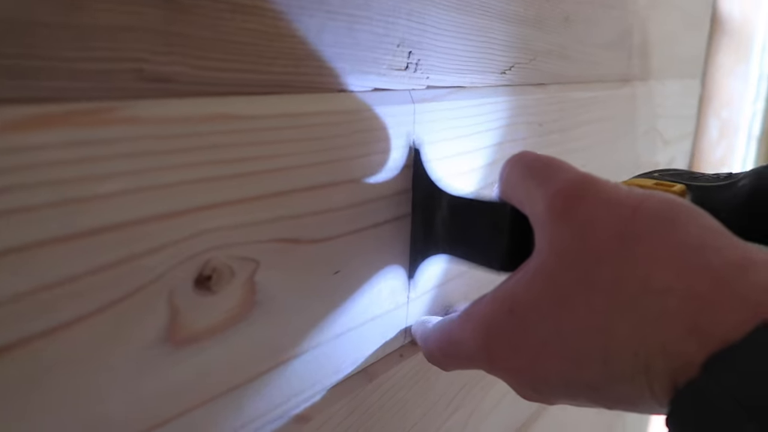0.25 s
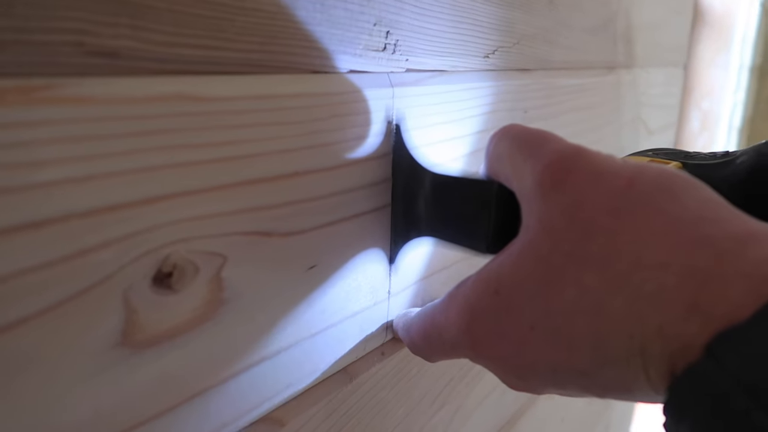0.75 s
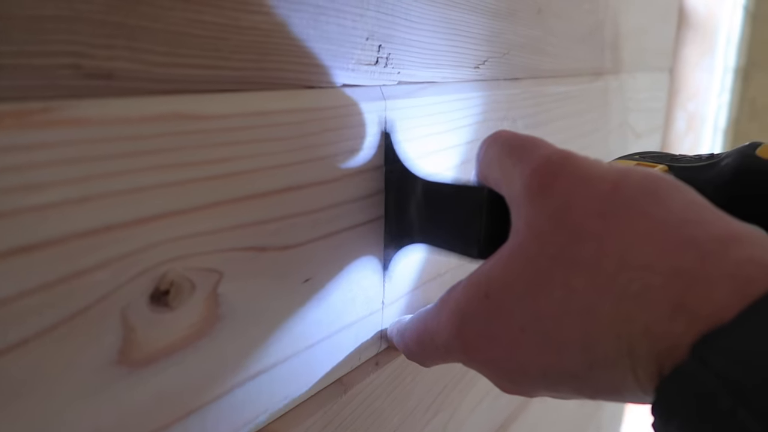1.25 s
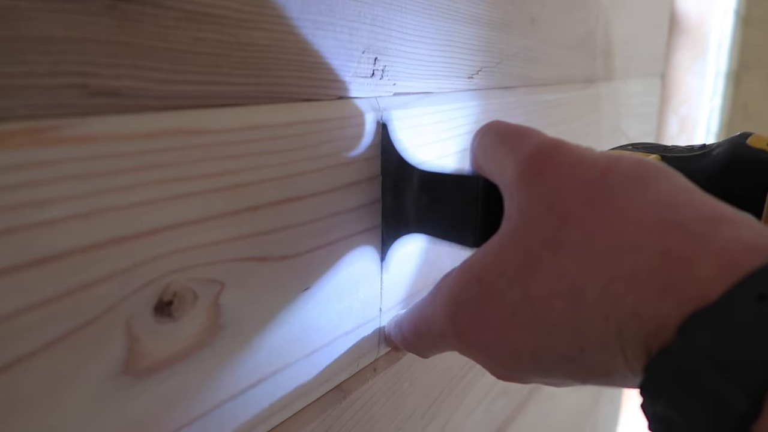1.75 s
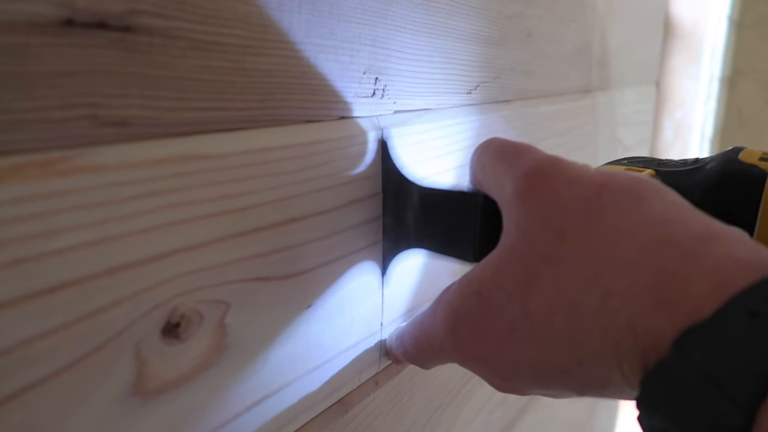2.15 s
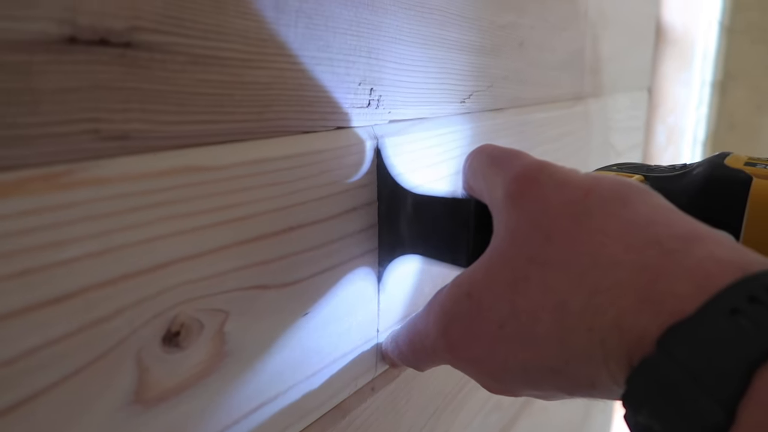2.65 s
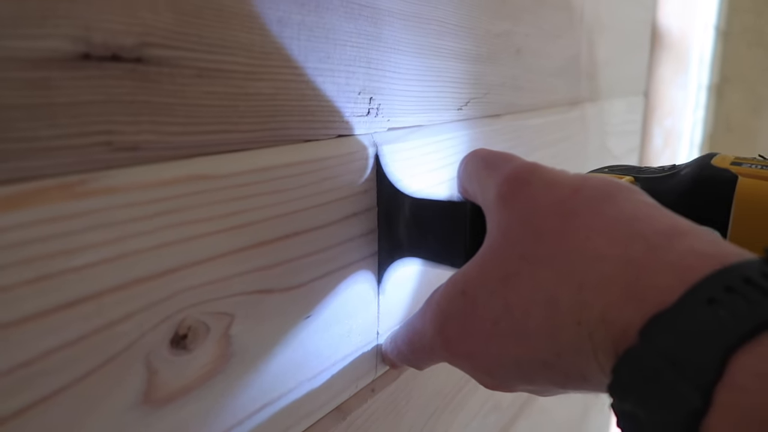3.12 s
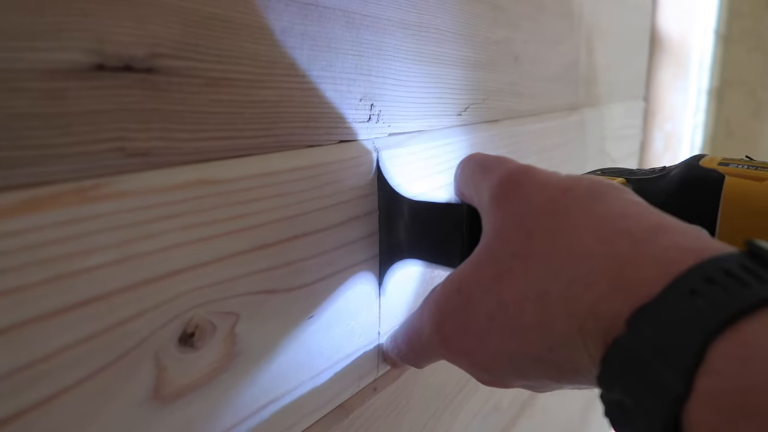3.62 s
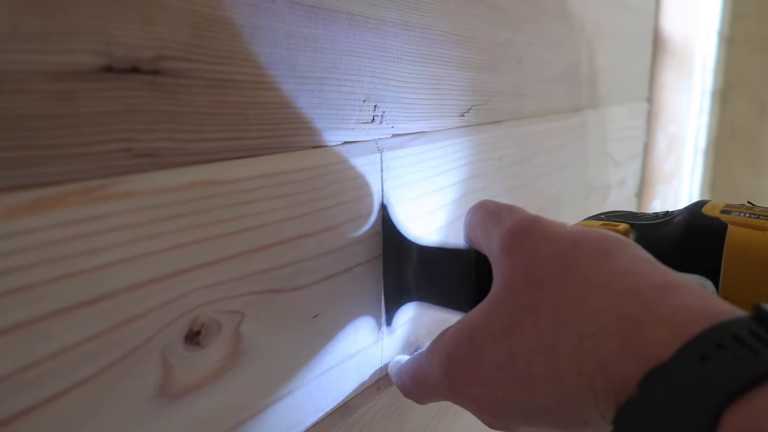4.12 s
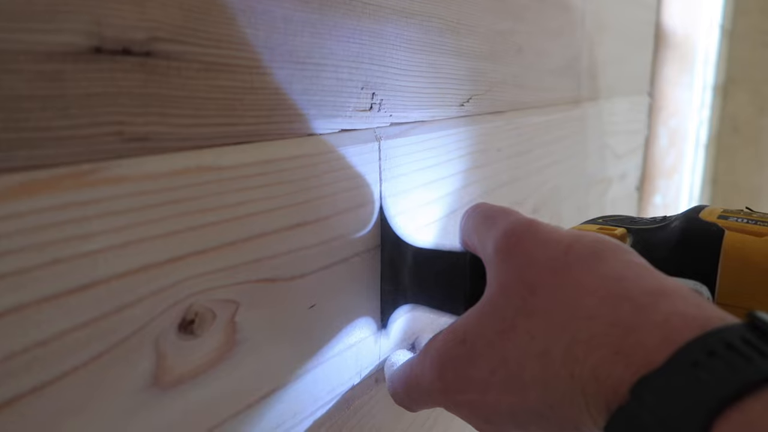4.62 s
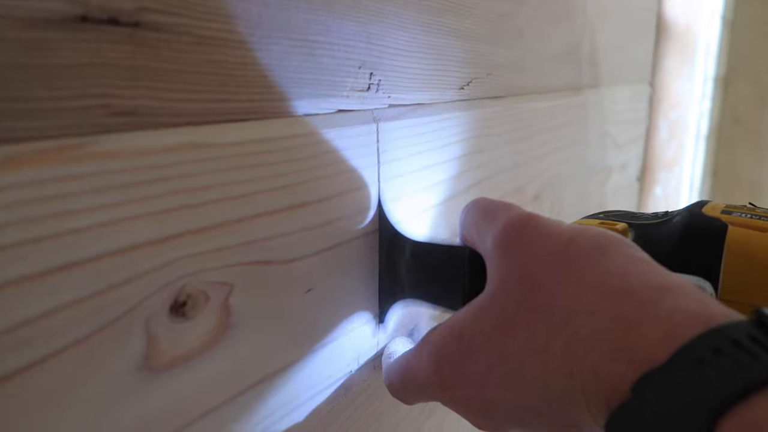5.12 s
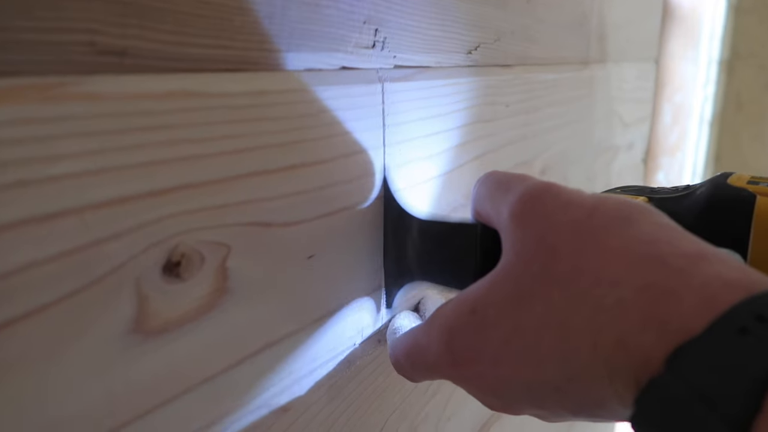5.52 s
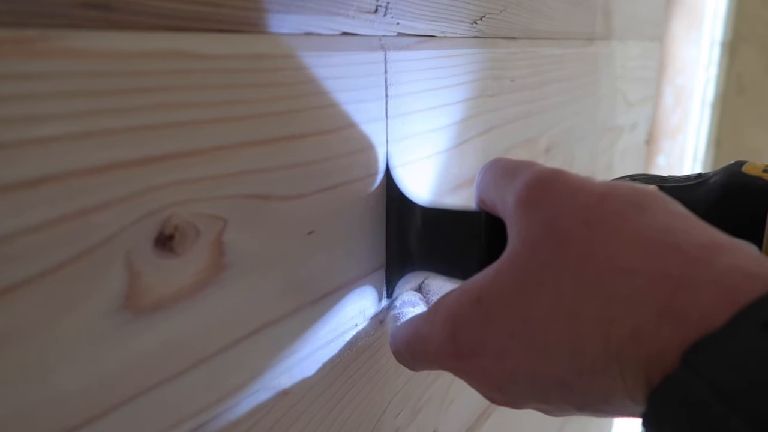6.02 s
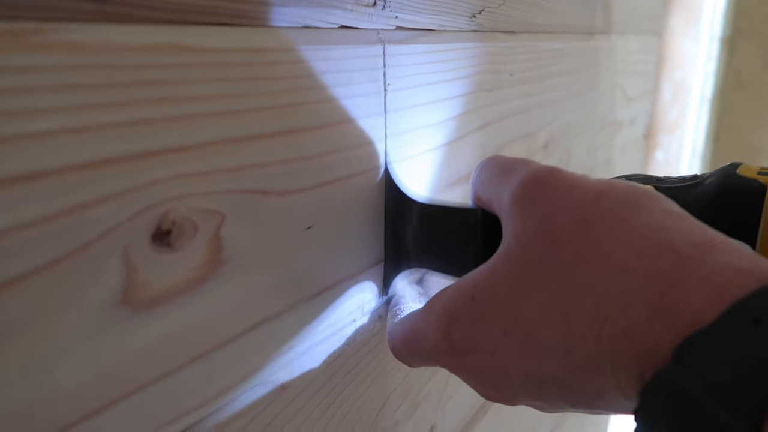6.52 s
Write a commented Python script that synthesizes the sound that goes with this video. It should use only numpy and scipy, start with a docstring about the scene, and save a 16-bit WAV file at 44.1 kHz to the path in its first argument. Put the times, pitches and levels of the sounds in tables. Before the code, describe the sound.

Close up indoors, an oscillating saw buzzes and rasps through wood, squealing briefly as its pitch sags in steps.

```python
"""A bare room, close up: an oscillating tool scores a line into softwood boards.
Every swing of the blade shakes the boards alike, giving a stack of overtones on the swing rate,
which sags under load. Board resonances lift some overtones; others squeal or sing as the blade catches.
The teeth rasp twice a swing, at times every second swing bites harder, and the walls add a short tail."""
import sys
import numpy as np
from scipy import signal
from scipy.io import wavfile
from scipy.ndimage import uniform_filter1d

SR = 44100
rng = np.random.default_rng(int(sys.argv[2]) if len(sys.argv) > 2 else 0)


def transcribe(signal):
    """Save signal, clipped to [-1, 1], as a 16-bit WAV file at the path in sys.argv[1]."""
    frames = np.atleast_2d(signal).T
    limited = np.clip(frames, -1, 1)
    pcm = np.round(limited * 32767).astype(np.int16)
    wavfile.write(sys.argv[1], SR, pcm)


N = 298116
STEP = 64   # samples per control step
CONTROL_S = np.arange(N // STEP + 2) * STEP / SR

# noise of torn fibres: time_s, level_db
TEARING = [(0.0, -27), (0.23, -35), (0.52, -29), (0.87, -31.5), (1.04, -25.5), (1.22, -34), (1.42, -29),
           (1.55, -25), (1.64, -31), (1.8, -30.5), (2.1, -35), (2.4, -26), (2.65, -36), (3.05, -34.5),
           (3.23, -25.5), (3.43, -28.5), (3.6, -34), (3.8, -27.5), (4.07, -22), (4.3, -23.5), (4.8, -26),
           (4.95, -29.5), (5.15, -28), (5.51, -30), (5.7, -23.5), (5.85, -26.5), (6.2, -31.5),
           (6.45, -26.5), (6.76, -34.5)]
# stereo width: freq_hz, side_minus_mid_db
WIDTH = [(60, -26), (110, -2), (200, -30), (380, -10), (700, -20), (1290, -22.5), (2380, -17), (4400, -7),
         (8120, 1), (15000, -0.5)]


def from_db(db):
    return 10 ** (np.asarray(db) / 20)


def curves(rows):
    """Columns of a time table at control rate."""
    time_s, *columns = np.transpose(rows)
    return [np.interp(CONTROL_S, time_s, column) for column in columns]


def to_audio(control, steps=np.arange(N) / STEP):
    """Control rate to sample rate."""
    return np.interp(steps, np.arange(len(control)), control)


def at_hz(spectrum, hz):
    """Spectrum read on a log-frequency axis."""
    freq_hz, level_db = np.transpose(spectrum)
    return np.interp(np.log(hz), np.log(freq_hz), level_db)


def drift(corner_hz):
    """Low-passed noise at control rate, unit rms."""
    pole = np.exp(-2 * np.pi * corner_hz * STEP / SR)
    white = rng.standard_normal(len(CONTROL_S) + 1000)
    slow = uniform_filter1d(signal.lfilter([1], [1, -2 * pole, pole * pole], white), 5)[1000:]
    return slow / np.sqrt(np.mean(slow ** 2))


def gate(start_s, end_s, fade_s):
    """0-1 window with linear edges, at control rate."""
    return np.clip(np.minimum(CONTROL_S - start_s, end_s - CONTROL_S) / fade_s + .5, 0, 1)


def stereo(mid, side):
    return np.array([mid + side, mid - side])


def fast_cos(phase):
    return np.cos((phase % (2 * np.pi)).astype(np.float32))


def tone(cycles, hz, level_db, waver_db, slip_rad):
    """One partial; level and phase wander as the contact shifts, the side signal also on its own."""
    slow_db = waver_db * drift(10.2)
    flicker_db = (1.3 + 0.4 * np.abs(waver_db)) * drift(30.5)
    gain = np.sqrt(2) * from_db(level_db + slow_db + flicker_db)
    phase = 2 * np.pi * (cycles + rng.random()) + to_audio(slip_rad * drift(25.0))
    side_gain = gain * from_db(at_hz(WIDTH, hz) + 2.0 * drift(0.72))
    side_phase = phase + 2 * np.pi * rng.random() + to_audio(2.06 * drift(0.55))
    return stereo(to_audio(gain) * fast_cos(phase), to_audio(side_gain) * fast_cos(side_phase))


def room_tail(source, t60_s=.85, send_db=-11, wall_cutoff_hz=2200):
    """Dense, dull wall reflections, wider towards the treble."""
    t = np.arange(round(t60_s * SR)) / SR
    mid, side = rng.standard_normal((2, len(t))) * from_db(-60 * t / t60_s) * (t > .004)
    side = signal.sosfilt(signal.butter(2, 3500, "high", fs=SR, output="sos"), side)
    walls = signal.butter(1, wall_cutoff_hz, fs=SR, output="sos")
    response = signal.sosfilt(walls, stereo(mid, side)) / np.sqrt(np.sum(mid ** 2))
    return from_db(send_db) * signal.fftconvolve(response, source.mean(0)[None], axes=1)[:, :N]


def lingering_pitch(length_s=.5, attack_s=0.0095, decay_db_per_s=116):
    """After a sudden sag the earlier pitch hangs in the room, wavers and dies away."""
    # lingering notes: start_s, pitch_hz, level_db, hold_s
    notes = [(3.19, 277.5, -49, .13), (5.118, 255, -43, .13)]
    # their spectrum: freq_hz, gain_db
    colour = [(250, -7), (520, -8.5), (800, -5), (1050, -6), (1300, 0.5), (1800, -2.5), (2100, -12),
              (3100, -6)]
    t, out = np.arange(round(length_s * SR)) / SR, np.zeros(N)
    attack = np.minimum(t / attack_s, 1)
    for start_s, hz, db, hold_s in notes:
        level_db = db - decay_db_per_s * np.maximum(t - hold_s, 0)
        for k in range(1, 10):
            waver_db = 3 * to_audio(drift(9.3), t * SR / STEP)
            gain = np.sqrt(2) * from_db(level_db + at_hz(colour, k * hz) + waver_db) * attack
            out[round(start_s * SR):][:len(t)] += gain * fast_cos(2 * np.pi * (k * hz * t + rng.random()))
    return out


def body_hum(cycles, hz):
    """The three lowest harmonics, radiated by tool body and wall."""
    # hum levels: time_s, first_db, second_db, third_db
    levels = [(0.0, -50, -56, -53), (0.04, -45, -48.5, -59), (0.3, -52.5, -50, -48.5),
              (0.71, -48, -45, -37.5), (0.92, -64.5, -45, -44.5), (1.11, -48, -46, -48.5),
              (1.49, -65, -48, -47), (1.69, -49, -48, -40.5), (1.78, -58, -49, -53),
              (1.98, -52.5, -45, -44.5), (2.94, -48.5, -49, -43.5), (3.16, -44.5, -50, -42),
              (3.2, -52, -50, -43), (3.35, -44, -50, -53), (3.46, -46, -46, -40), (3.6, -46, -42.5, -46),
              (4.03, -46.5, -54, -49.5), (4.25, -42, -52, -41.5), (4.39, -46, -47, -41),
              (4.8, -41.5, -46, -46), (5.1, -45.5, -49, -45), (5.14, -48, -48, -39.5),
              (5.29, -51, -55, -42.5), (5.4, -51, -44.5, -47), (5.71, -50, -63, -44),
              (5.8, -45, -41, -39.5), (6.23, -47.5, -44.5, -39), (6.46, -37.5, -51, -41),
              (6.63, -66, -51, -48), (6.76, -44, -43.5, -35.5)]
    return sum(tone(k * cycles, k * hz, db + 0.5 * drift(0.91), waver_db=-1.5, slip_rad=0.08)
               for k, db in enumerate(curves(levels), 1))


def blade_ring(noise, centre_hz=9730, width_hz=200, mix_db=1.5):
    """The blade rings softly with the hiss."""
    resonance = signal.iirpeak(centre_hz, centre_hz / width_hz, SR)
    return noise + from_db(mix_db) * signal.lfilter(*resonance, noise)


def rasp(cycles, sag_hz, press_db, hiss_db):
    """Teeth tear fibres: wall rumble, tearing and hiss in half-octave bands, pulsed by the swing."""
    # wall rumble: time_s, level_db
    rumble = [(0, -86), (1.1, -71), (1.3, -82), (1.6, -78), (4.4, -75), (4.7, -71), (5.2, -79), (5.6, -75),
              (6.76, -78)]
    # rumble spectrum: freq_hz, gain_db
    rumble_colour = [(30, 1), (60, 24), (120, 26)]
    # tearing spectrum: freq_hz, gain_db
    tear_colour = [(200, -19), (400, -25), (520, -22), (700, -22), (1000, -8), (1400, -5), (2000, -6),
                   (2800, -3.5), (4000, -5), (5600, -6)]
    # hiss spectrum: freq_hz, gain_db
    hiss_colour = [(6000, 8), (8000, 5), (10000, 1), (12000, 5), (14000, 3), (17000, -4)]
    white = rng.standard_normal((2, 2, N))   # even/odd band, mid/side, sample
    scatter = np.diff(rng.standard_normal(90), 2)   # near boards throw treble sideways
    scattered = signal.lfilter(scatter / np.linalg.norm(scatter), 1, white[:, 0])
    white[:, 1] = .7 * scattered + .7 * white[:, 1]
    stroke = .16 * np.cos(2 * np.pi * cycles) + .24 * np.cos(4 * np.pi * cycles + 1.6)
    common_db = .5 * drift(0.68)
    tear_db = curves(TEARING)[0]
    rumble_db = curves(rumble)[0] + 4 * drift(2.1)
    out, edges_hz = 0, 28 * 2 ** np.arange(0, 9.6, .5)
    for k, band_hz in enumerate(zip(edges_hz, edges_hz[1:])):
        hz = np.sqrt(np.prod(band_hz))
        mid, side = signal.sosfilt(signal.butter(3, band_hz, "band", fs=SR, output="sos"), white[k % 2])
        if hz < 150:
            level_db = rumble_db + at_hz(rumble_colour, hz)
        elif hz < 6000:
            level_db = tear_db + at_hz(tear_colour, hz) + (hz >= 1700) * press_db
        else:   # hiss above 11 kHz is turned down as the pitch falls
            level_db = hiss_db + at_hz(hiss_colour, hz) - (hz > 11000) * 0.09 * sag_hz
        fast_db, slow_db = (2.2, 1.5) if hz < 6000 else (.9, .6)
        gain = to_audio(from_db(level_db + common_db + fast_db * drift(10.0) + slow_db * drift(3.0)))
        pulse = 1 + min(hz / 4000, 1) * stroke
        out += gain * pulse * stereo(mid, side * from_db(at_hz(WIDTH, hz)))
    return blade_ring(out)


def uneven_bite(cycles, hz, knock_db, fade_db_per_s=180):
    """Alternating strong and weak swings add tones midway between the harmonics, and an undertone."""
    # uneven spells: start_s, end_s, half_tones_re_knock_db, undertone_db
    spells = [(1.72, 3.05, -15, -66), (3.05, 3.2, -13, -61), (3.2, 3.5, -15, -69)]
    # half-tone spectrum: freq_hz, gain_db
    colour = [(400, -26), (900, -12), (1250, -7), (2000, -9), (2700, -11), (4000, -18), (6000, -24)]
    start_s, end_s, spell_half_db, spell_under_db = np.transpose(spells)[:, :, None]
    outside_s = np.maximum(np.maximum(start_s - CONTROL_S, CONTROL_S - end_s), 0)
    fade_db = fade_db_per_s * outside_s
    half_db = knock_db + np.maximum((spell_half_db - fade_db).max(0), -27)
    under_db = np.maximum((spell_under_db - fade_db).max(0), -95)
    half_tones = sum(tone(k * cycles, k * hz, half_db + at_hz(colour, k * hz), waver_db=4.0, slip_rad=.9)
                     for k in np.arange(1.5, 19))
    return half_tones + tone(cycles / 2, hz / 2, under_db, waver_db=2.0, slip_rad=.5)


def peak(hz, centre_hz, width_hz):
    """Resonance curve, 1 at the centre."""
    return 1 / (1 + (2 * (hz - centre_hz) / width_hz) ** 2)


def board_lift_db(hz, lowest_drive, upper_drive, far_drive):
    """Board resonances, each as strong as the blade drives it from where it sits."""
    # board resonances: centre_hz, width_hz, lift_db
    near_modes = [(1170, 164, 8.5), (1660, 120, 13), (2782, 16, 0.5), (4615, 52, 9.5), (5446, 95, 18.5)]
    # resonances further down the cut: centre_hz, width_hz, lift_db
    far_modes = [(1155, 32, 0), (1500, 14, 1), (2200, 99, 5.5), (3030, 84, 4)]
    near_db = [db * peak(hz, centre_hz, width_hz) for centre_hz, width_hz, db in near_modes]
    far_db = [db * peak(hz, centre_hz, width_hz) for centre_hz, width_hz, db in far_modes]
    return lowest_drive * near_db[0] + upper_drive * sum(near_db[1:]) + far_drive * sum(far_db)


def squeal_lift_db(hz):
    """The blade catches: a group of overtones sings out until it lets go."""
    # catches: start_s, end_s, centre_hz, width_hz, lift_db
    catches = [(0.01, 0.073, 3100, 600, -1), (1.054, 1.36, 2550, 445, 3), (1.608, 1.756, 2900, 500, 12),
               (3.675, 3.834, 4530, 1500, 8), (4.857, 5.102, 2140, 550, 2), (5.46, 5.593, 990, 400, 9.5),
               (5.75, 5.996, 2980, 600, 7), (6.557, 6.737, 2680, 610, 5)]
    return sum(db * gate(start_s, end_s, fade_s=0.0095) * peak(hz, centre_hz, width_hz)
               for start_s, end_s, centre_hz, width_hz, db in catches)


def singing(k):
    """Harmonic k locks on to the wood and rings steadily; returns lock (0-1) and locked level in dB."""
    # locks: start_s, end_s, harmonic, level_db
    locks = [(0.0, 0.07, 12, -38.5), (0.0, 0.07, 19, -43.5), (0.0, 0.08, 11, -37.0), (0.0, 0.11, 10, -38.0),
             (0.0, 0.15, 4, -38.0), (0.18, 0.38, 5, -40.5), (0.2, 0.39, 25, -48.0), (0.25, 0.35, 13, -42.0),
             (0.26, 0.4, 10, -40.5), (0.36, 0.51, 21, -46.5), (0.4, 0.62, 10, -34.5),
             (0.41, 0.61, 4, -35.0), (0.41, 0.74, 15, -39.0), (0.42, 0.49, 22, -44.5),
             (0.43, 0.58, 19, -45.0), (0.45, 0.59, 25, -46.5), (0.45, 0.7, 6, -40.0), (0.6, 0.85, 5, -35.0),
             (0.61, 0.9, 4, -35.0), (0.62, 0.8, 10, -33.5), (0.7, 1.03, 6, -36.0), (0.72, 0.82, 25, -47.5),
             (0.74, 0.97, 15, -42.5), (0.8, 0.88, 21, -42.5), (0.8, 1.03, 10, -34.0),
             (0.82, 0.89, 18, -37.5), (0.52, 0.64, 18, -45.0), (0.8, 1.0, 20, -44.5), (0.88, 1.0, 5, -38.0),
             (0.9, 1.42, 4, -33.5), (0.96, 1.08, 8, -36.0), (0.93, 1.11, 24, -47.0), (0.97, 1.1, 15, -38.5),
             (1.0, 1.07, 14, -37.5), (1.01, 1.08, 12, -34.5), (1.03, 1.22, 10, -34.0),
             (1.03, 1.45, 6, -32.5), (1.07, 1.15, 20, -41.5), (1.09, 1.33, 19, -41.5),
             (1.09, 1.34, 9, -32.0), (1.1, 1.31, 25, -49.5), (1.12, 1.24, 16, -43.0),
             (1.2, 1.32, 14, -40.0), (1.28, 1.52, 10, -35.0), (1.32, 1.5, 8, -38.0),
             (1.33, 1.59, 19, -45.5), (1.34, 1.52, 12, -37.0), (1.35, 1.58, 25, -47.5),
             (1.38, 1.5, 24, -45.0), (1.45, 1.78, 6, -33.0), (1.59, 2.2, 4, -33.0), (1.62, 1.71, 11, -34.0),
             (1.67, 1.77, 10, -31.5), (1.77, 2.31, 20, -41.5), (1.78, 2.5, 6, -29.5),
             (1.79, 1.88, 12, -36.0), (1.8, 2.3, 9, -35.5), (1.81, 1.88, 26, -48.5),
             (1.84, 1.98, 11, -35.5), (1.84, 2.04, 15, -41.0), (1.92, 2.12, 18, -43.0),
             (2.04, 2.12, 11, -34.5), (2.13, 2.23, 26, -49.0), (2.14, 2.33, 25, -48.5),
             (2.15, 2.55, 11, -39.0), (2.2, 2.29, 4, -37.5), (2.29, 2.37, 15, -38.0),
             (2.29, 2.47, 4, -33.5), (2.31, 2.41, 12, -34.0), (2.35, 2.42, 18, -41.5),
             (2.35, 2.9, 9, -38.0), (2.37, 2.55, 20, -44.5), (2.47, 2.63, 4, -37.5), (2.5, 2.63, 19, -41.0),
             (2.79, 2.9, 19, -40.5), (2.93, 3.06, 19, -43.0), (2.5, 3.18, 6, -30.5), (2.51, 2.6, 25, -45.0),
             (2.51, 2.72, 28, -48.0), (2.58, 2.79, 12, -36.0), (2.59, 2.7, 10, -33.5),
             (2.6, 2.73, 20, -44.0), (2.61, 2.69, 14, -38.5), (2.63, 3.11, 4, -34.5),
             (2.67, 2.94, 23, -46.0), (2.72, 3.1, 11, -40.0), (2.79, 2.88, 13, -38.0),
             (2.86, 3.12, 28, -50.0), (2.91, 3.05, 12, -37.0), (2.94, 3.18, 10, -34.0),
             (2.97, 3.15, 24, -47.0), (3.09, 3.17, 19, -43.0), (3.12, 3.19, 15, -38.0),
             (3.12, 3.22, 21, -47.0), (3.17, 3.39, 11, -35.0), (3.2, 3.3, 7, -35.5),
             (3.25, 3.32, 18, -43.5), (3.29, 3.57, 6, -35.0), (3.3, 3.37, 14, -37.0),
             (3.3, 3.41, 26, -49.0), (3.22, 3.31, 8, -37.0), (3.32, 3.44, 5, -37.0),
             (3.36, 3.48, 28, -47.0), (3.37, 3.46, 21, -45.0), (3.38, 3.55, 17, -38.0),
             (3.4, 3.61, 18, -40.5), (3.46, 3.55, 14, -36.5), (3.46, 3.77, 8, -34.5),
             (3.47, 3.64, 12, -34.0), (3.48, 3.64, 20, -43.0), (3.52, 3.6, 22, -43.0),
             (3.6, 3.82, 4, -36.5), (3.63, 3.7, 14, -34.5), (3.63, 3.85, 6, -36.0), (3.64, 3.83, 5, -34.5),
             (3.68, 3.86, 18, -38.0), (3.7, 3.8, 14, -36.0), (3.7, 3.8, 17, -38.5), (3.7, 3.77, 12, -34.0),
             (3.78, 4.24, 25, -52.0), (3.81, 3.89, 11, -38.5), (4.09, 4.2, 5, -37.0), (4.1, 4.58, 6, -40.5),
             (4.38, 4.7, 25, -48.0), (4.4, 4.47, 16, -43.0), (4.44, 4.61, 13, -38.0),
             (4.52, 4.59, 23, -44.5), (4.57, 4.65, 11, -37.0), (4.58, 4.78, 6, -34.5),
             (4.68, 4.75, 13, -36.5), (4.7, 4.84, 22, -45.5), (4.71, 4.8, 12, -36.5),
             (4.74, 4.84, 18, -43.0), (4.78, 4.87, 14, -37.0), (4.8, 5.1, 6, -37.5),
             (4.84, 5.17, 15, -38.5), (4.84, 4.96, 7, -34.0), (4.85, 4.97, 21, -44.5),
             (4.85, 5.11, 8, -36.0), (4.85, 5.11, 9, -34.0), (4.89, 4.97, 12, -34.0),
             (4.98, 5.19, 28, -50.0), (5.01, 5.11, 12, -36.5), (5.05, 5.18, 7, -35.0),
             (5.11, 5.22, 14, -41.5), (5.13, 5.22, 21, -46.0), (5.14, 5.3, 8, -39.0),
             (5.16, 5.36, 16, -40.5), (5.26, 5.38, 7, -36.5), (5.15, 5.3, 4, -39.5), (5.25, 5.34, 5, -37.0),
             (5.31, 5.42, 18, -42.5), (5.46, 5.6, 15, -40.0), (5.47, 5.59, 5, -35.0),
             (5.47, 5.59, 11, -40.0), (5.51, 5.58, 24, -48.5), (5.75, 5.92, 7, -37.5),
             (5.75, 5.95, 12, -33.5), (5.77, 6.0, 20, -40.0), (5.84, 5.96, 24, -42.5),
             (5.91, 6.02, 5, -32.0), (5.94, 6.04, 8, -36.0), (5.95, 6.04, 28, -44.0),
             (5.98, 6.15, 27, -45.0), (6.01, 6.09, 15, -36.5), (6.02, 6.1, 5, -40.5),
             (6.08, 6.16, 23, -46.0), (6.09, 6.37, 16, -38.0), (6.1, 6.51, 5, -32.5),
             (6.12, 6.25, 12, -35.5), (6.14, 6.36, 18, -41.0), (6.16, 6.28, 8, -37.5),
             (6.17, 6.24, 20, -43.5), (6.2, 6.37, 13, -36.0), (6.28, 6.39, 23, -41.5),
             (6.29, 6.38, 27, -43.0), (6.34, 6.41, 11, -35.0), (6.35, 6.46, 12, -35.0),
             (6.38, 6.47, 21, -44.5), (6.4, 6.52, 13, -39.0), (6.49, 6.57, 16, -36.5),
             (6.51, 6.72, 7, -35.0), (6.53, 6.7, 17, -36.0), (6.57, 6.7, 13, -35.0),
             (6.59, 6.69, 21, -39.5), (6.64, 6.76, 26, -41.0), (6.67, 6.76, 14, -34.0),
             (6.68, 6.76, 12, -34.0), (6.68, 6.76, 20, -37.5)]
    lock, weighted_db = np.zeros((2, len(CONTROL_S)))
    for start_s, end_s, harmonic, db in locks:
        if harmonic == k:
            window = gate(start_s, end_s, fade_s=0.017)
            lock += window
            weighted_db += window * db
    return np.minimum(lock, 1), weighted_db / np.maximum(lock, 1e-9)


def cut_levels_db(press_db):
    """Levels of five registers: knock, ring, buzz and sizzle follow hand pressure, hiss its own curve."""
    # knock, ring, buzz, sizzle: level_db, pressure_factor, wander_db
    registers = [(-36, 0.68, 2.5), (-32, 1.38, 2), (-32, 1.25, 0.5), (-38.5, 1.14, 2.5)]
    # treble hiss: time_s, level_db
    hiss = [(0.0, -49.5), (0.13, -46), (1.09, -40.5), (1.2, -47), (1.47, -42.5), (1.54, -47), (1.71, -42.5),
            (3.09, -42), (3.16, -43.5), (3.82, -41), (4.01, -51.5), (4.76, -40), (5.67, -45), (5.8, -37),
            (6.27, -42.5), (6.32, -36), (6.46, -44.5), (6.76, -40.5)]
    pressed_db = [db + factor * press_db + wander_db * drift(4.4) for db, factor, wander_db in registers]
    return pressed_db + [curves(hiss)[0] + 0.93 * drift(21.0)]


def blend_db(levels_db, hz):
    """Level at a moving frequency, crossfaded between registers."""
    # knock, ring, buzz, sizzle, hiss: centre_hz
    centres_hz = [1100, 1700, 2800, 4600, 8000]
    position = np.interp(np.log(hz), np.log(centres_hz), range(len(centres_hz)))
    return sum(np.clip(1 - abs(position - k), 0, 1) * db for k, db in enumerate(levels_db))


def whine(cycles, hz, levels_db):
    """Boards shaken by each swing: harmonics 4-35; high ones waver more, resonant or locked ones less."""
    # overtone spectrum: freq_hz, gain_db
    colour = [(800, -7), (1300, -11), (2000, -15.5), (2800, -12.5), (4000, -11.5), (5500, -15.5),
              (7000, -14.5), (9000, -20.5), (12000, -17)]
    # blade's seat along the boards: time_s, lowest_drive, upper_drive, far_drive, tilt_db_per_octave
    seat = [(0, 0.14, 0.017, 0.37, 0.67), (.5, 1, 1, 0.33, 0.19), (1.0, 0.72, 1, 1.2, 1),
            (1.7, 0.63, 0.58, 1.05, 0.38), (3.15, 0.63, 0.96, 0.097, 0.96), (3.25, 0.11, 0.43, 1.3, -0.19),
            (3.75, 0.69, 0.033, 0.057, -0.15), (3.95, 0.26, 0.093, 0.86, 0.81),
            (4.8, 0.23, 0.37, 1.1, -0.94), (4.88, 0.24, 0.5, 1.2, -1.5), (5.1, 0.17, 0.15, 0, -0.52),
            (5.15, 0.033, 0.57, 0, -0.88), (5.5, 0.073, 0.03, 0, -1.4), (5.8, 0.47, 0, 0, -3),
            (6.4, 1, 0.4, 1.9, -2.4), (6.76, 0.95, 0, 0.22, 0.98)]
    *drives, tilt_db_per_octave = curves(seat)
    # the more fibres tear, the less alike the swings
    roughness = np.clip(1 + 0.043 * (curves(TEARING)[0] + 37), .5, 1.8)
    # overtones lose their grip while the speed changes fast
    glide_hz_per_s = np.abs(np.gradient(hz)) * SR / STEP
    glide_loss_db = 5 * np.minimum(glide_hz_per_s / 700, 1)
    out = 0
    for k in range(4, 36):
        tone_hz = k * hz
        lift_db = board_lift_db(tone_hz, *drives) + squeal_lift_db(tone_hz)
        free_db = blend_db(levels_db, tone_hz) + at_hz(colour, tone_hz) + lift_db
        free_db += tilt_db_per_octave * np.log2(tone_hz / 2000)
        free_db -= 0.5 * np.maximum(singing(k - 1)[0], singing(k + 1)[0])   # dip beside a singing one
        lock, locked_db = singing(k)
        level_db = free_db + lock * (locked_db - free_db) - glide_loss_db
        looseness = roughness * (1 - 0.78 * lock)
        waver_db = looseness * min(0.6 * k, 3.0) / (1 + np.maximum(lift_db, 0) / 4.9)
        out += tone(k * cycles, tone_hz, level_db, waver_db, slip_rad=looseness * (0.1 + 0.022 * k))
    return out


def scene(no_load_hz=284, mean_press_db=-28):
    """Swing rate and hand pressure drive the cut; the room answers."""
    # drive, sagging as the blade goes deeper: time_s, swing_hz
    speed = [(0.0, 282.5), (0.2, 285.6), (0.49, 282.5), (0.64, 285.3), (0.96, 283.3), (1.014, 281.1),
             (1.214, 277.1), (1.476, 281.8), (1.534, 278.9), (1.606, 283.5), (1.66, 276.9), (1.746, 281.2),
             (1.88, 278.3), (2.4, 278.8), (2.56, 277.3), (2.8, 280.2), (3.175, 277.2), (3.192, 256),
             (3.33, 250.3), (3.62, 243.9), (3.71, 245.1), (3.85, 256.0), (3.95, 259.5), (4.1, 261),
             (4.16, 257.3), (4.23, 262.5), (4.55, 261.3), (4.64, 257.3), (4.73, 260.3), (4.85, 255.3),
             (5.095, 254.8), (5.108, 251.5), (5.126, 235), (5.18, 234.5), (5.3, 236), (5.49, 240.3),
             (6.02, 236.4), (6.11, 238.3), (6.24, 236.0), (6.3, 231.2), (6.4, 227.5), (6.55, 212),
             (6.62, 210.8), (6.76, 214.5)]
    # hand pressure, as loudness of the cut: time_s, level_db
    pressure = [(0.0, -30.5), (0.04, -28.5), (0.19, -33), (0.45, -28), (1.17, -27.5), (1.6, -29.5),
                (1.64, -25.5), (3.07, -25.5), (3.12, -28), (3.78, -25), (3.88, -30.5), (4.09, -35),
                (4.1, -31), (4.2, -33), (4.7, -26), (5.06, -27.5), (5.23, -31), (5.27, -26.5),
                (5.46, -28.5), (5.5, -28.5), (5.69, -32), (5.82, -26), (5.95, -26), (6.1, -26),
                (6.12, -26.5), (6.76, -25)]
    swing_hz = curves(speed)[0] * (1 + 0.000884 * drift(11.4))
    cycles = np.cumsum(to_audio(swing_hz)) / SR
    press_db = curves(pressure)[0] - mean_press_db
    levels_db = cut_levels_db(press_db)
    tool = whine(cycles, swing_hz, levels_db) + body_hum(cycles, swing_hz)
    tool += uneven_bite(cycles, swing_hz, knock_db=levels_db[0])
    tool += rasp(cycles, no_load_hz - swing_hz, press_db, hiss_db=levels_db[-1])
    return tool + room_tail(tool) + lingering_pitch()


def record(dry):
    """Steep low-pass at 15.75 kHz."""
    return signal.sosfilt(signal.ellip(12, .5, 75, 15750, fs=SR, output="sos"), dry)


dry = scene()
out = record(dry)
transcribe(out)
```